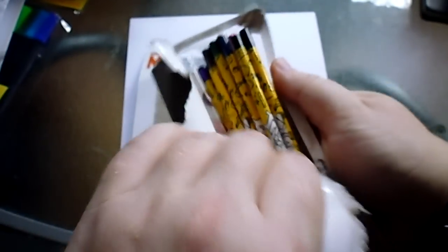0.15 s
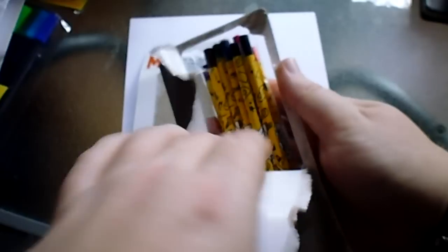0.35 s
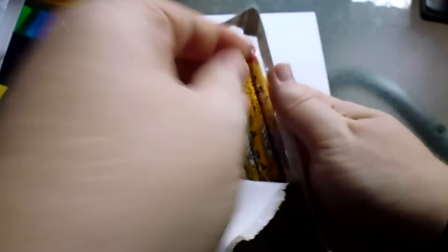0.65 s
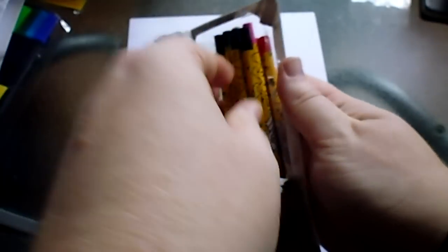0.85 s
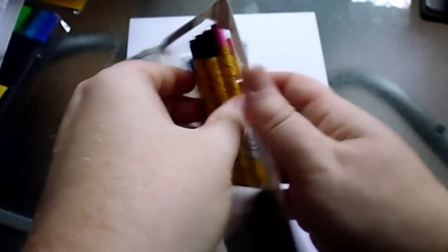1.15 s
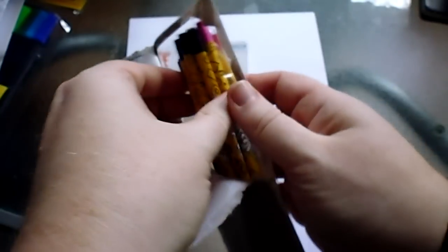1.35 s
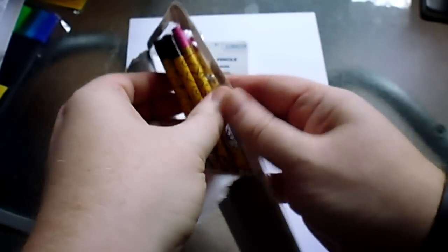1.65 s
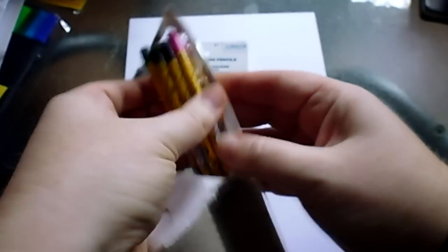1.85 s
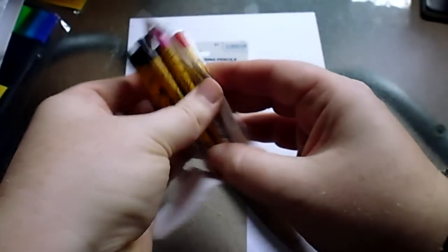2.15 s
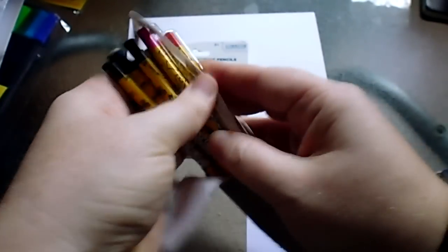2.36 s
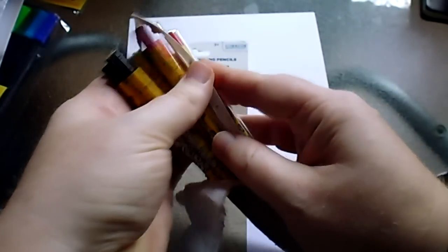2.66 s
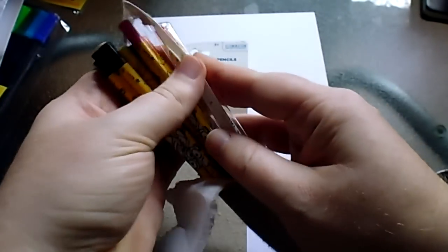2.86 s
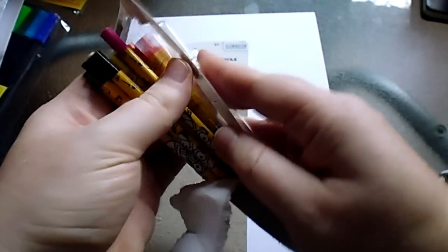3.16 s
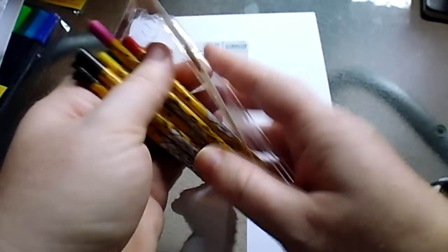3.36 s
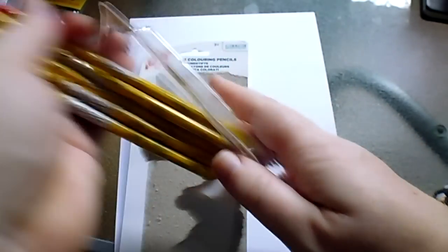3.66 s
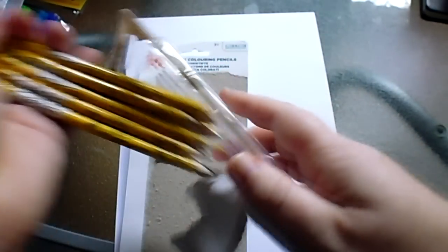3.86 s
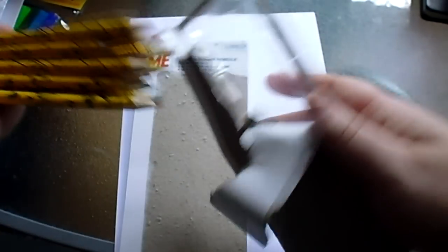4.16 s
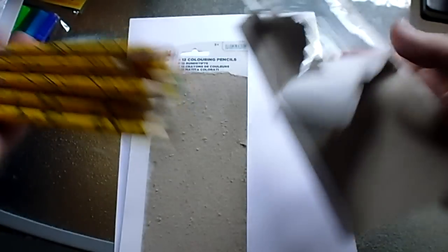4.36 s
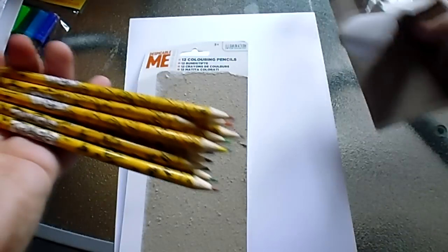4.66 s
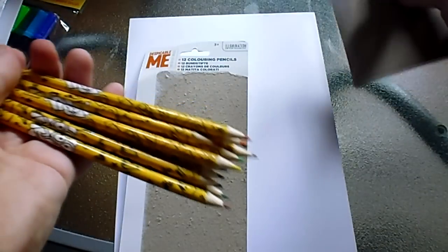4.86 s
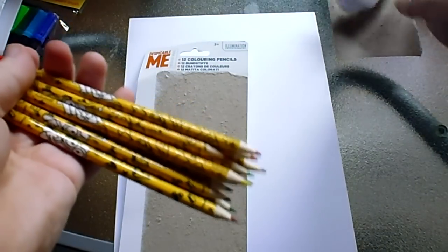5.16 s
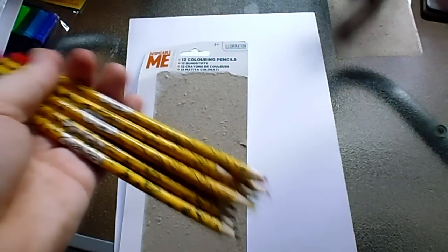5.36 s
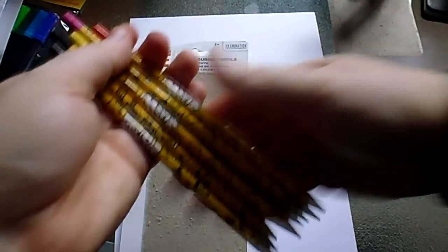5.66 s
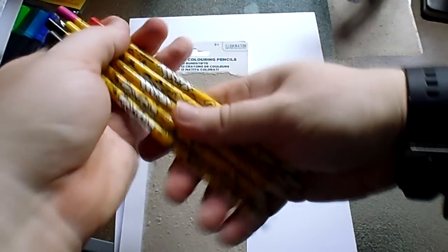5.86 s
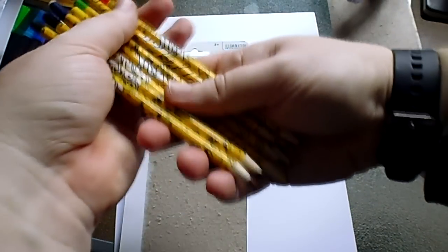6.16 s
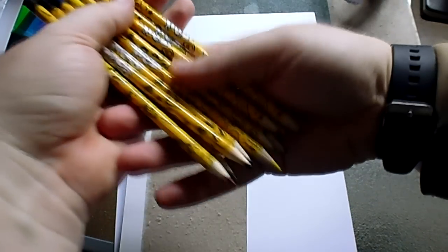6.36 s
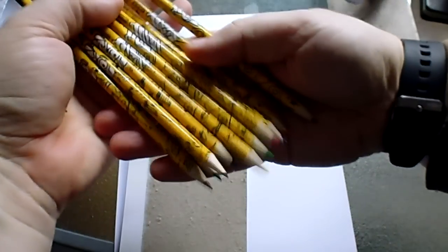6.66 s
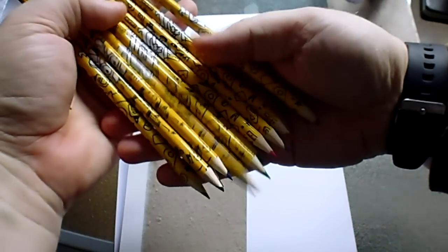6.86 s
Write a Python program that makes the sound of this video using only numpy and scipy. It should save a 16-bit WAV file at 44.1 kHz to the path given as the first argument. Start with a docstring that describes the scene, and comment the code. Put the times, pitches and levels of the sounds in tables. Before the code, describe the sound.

Close, quiet handling: card rasps and stiff plastic ticks and snaps, a tossed pack booms softly on a desk, then pencils roll and clack in the palm.

```python
"""Close up in a quiet room, hands bend a card-backed plastic blister pack to free a bundle of wooden pencils.
Over faint hiss and arm rumble, strokes of rasping card and sliding wood swell and fade; the shell snaps and
ticks as short noisy contacts ring its modes. The pack is tossed aside and lands: the desk booms and rings.
Then the freed pencils roll in the palm and click, as tiny contacts excite their damped bending modes."""
import sys
import numpy as np
from scipy import signal
from scipy.fft import rfft, irfft, next_fast_len
from scipy.io import wavfile

SR = 44100
rng = np.random.default_rng(int(sys.argv[2]) if len(sys.argv) > 2 else 0)


def digitize_waveform(pressure):
    """Quantize a signal to 16-bit integers and store it at the path in sys.argv[1].

    Rows of a 2-D input are taken as channels; values are limited to [-1, 1].
    """
    field = np.atleast_2d(pressure).T
    bounded = np.clip(field, -1, 1)
    quanta = np.round(bounded * 32767).astype(np.int16)
    wavfile.write(sys.argv[1], SR, quanta)


N = 309141
TIME = np.arange(N) / SR
HIT_TIME = TIME[:SR // 10]   # every hit lasts 0.1 s
LEAD_S = .015                # the main contact comes this long after a hit begins

# Modes of the blister shell. Each row: frequency at pitch ratio 1 [Hz], mean level [dB], 60 dB decay [s].
SHELL_MODES = [(774.5, -4.5, 0.039), (987, 3, 0.016), (1463, -3, 0.0051), (1870, 3.5, 0.013),
               (2746, -2.5, 0.012), (3780, -32, 0.0028), (4570, 3, 0.0079), (6510, -19.5, 0.0043)]
# Modes of a hand-held pencil. Each row: frequency at pitch ratio 1 [Hz], mean level [dB], 60 dB decay [s].
PENCIL_MODES = [(800, -11.5, 0.016), (1350, -21.5, 0.0063), (2450, -11, 0.04), (2870, -8, 0.0075),
                (3410, -3, 0.0064), (4330, 1, 0.0076), (5250, -1, 0.0024), (6290, -6, 0.014),
                (7330, -8, 0.0084), (8800, -3.5, 0.0037), (10460, -5, 0.012), (12400, -5, 0.015)]


def from_db(db):
    """Decibels to gain."""
    return 10 ** (np.asarray(db) / 20)


def rms_one(x):
    """Scale to rms 1."""
    return x / np.sqrt(np.mean(x ** 2) + 1e-20)


def unit_energy(x):
    """Scale to energy 1."""
    return x / np.sqrt(np.sum(x ** 2) + 1e-20)


def together(gains):
    """Unrelated noises add in power."""
    return np.sqrt(sum(gain ** 2 for gain in gains))


def add(track, s, sound):
    """Mix a sound in at a given time in seconds."""
    start = round(s * SR)
    track[start:start + len(sound)] += sound[:N - start]


def through(force, response):
    """A force played through a ringing body."""
    return signal.fftconvolve(force, response)[:len(force)]


def colour(x, spectrum):
    """Causal (minimum-phase) filter that follows a table of (Hz, dB)."""
    size = next_fast_len(len(x) + SR // 10)
    hz, db = np.transpose(spectrum)
    bins = np.maximum(np.arange(size // 2 + 1) * SR / size, 1)
    log_gain = np.log(from_db(np.interp(np.log(bins), np.log(hz), db)))
    # folding the cepstrum onto positive time gives the minimum phase
    cepstrum = irfft(log_gain, size)
    cepstrum[1:size // 2] *= 2
    cepstrum[size // 2 + 1:] = 0
    response = np.exp(rfft(cepstrum))
    return irfft(rfft(x, size) * response, size)[:len(x)]


def grains(per_s, spread_db, size):
    """Single-sample ticks of random sign and timing; their strength in dB spreads exponentially."""
    strength = from_db(spread_db * np.minimum(rng.exponential(1, size), 4))
    return (rng.random(size) < per_s / SR) * strength * rng.choice([-1, 1], size)


def flutter(per_s):
    """Smooth random unevenness with rms 1."""
    knots = rng.standard_normal(N // 20)
    return rms_one(np.interp(TIME * per_s, np.arange(len(knots)), knots))


def ringing(modes, pitch, scatter_db):
    """Response to one touch: every contact point feeds the modes differently."""
    hz, db, t60 = np.transpose(modes)[:, :, None]
    gain = from_db(db + scatter_db * rng.standard_normal(db.shape) - 60 * HIT_TIME / t60)
    return unit_energy(np.sum(gain * np.cos(2 * np.pi * hz * pitch * HIT_TIME), axis=0))


def contact(scatter_db, per_s, rise_s, t60):
    """One main contact, LEAD_S in, amid smaller ones that build up just before it and die away after."""
    t = HIT_TIME - LEAD_S
    envelope = from_db(-60 * np.where(t < 0, -t / rise_s, t / t60))   # 60 dB up, 60 dB down
    small = grains(per_s, spread_db=4.5, size=len(t)) * envelope
    force = from_db(scatter_db) * unit_energy(small)
    force[round(LEAD_S * SR)] += 1
    return force


def resonate(x, hz, q, gain_db):
    """Add the one resonance that a blow excites most."""
    return x + from_db(gain_db) * signal.lfilter(*signal.iirpeak(hz, q, fs=SR), x)


def disperse(x, delay_s):
    """Bending waves carry the highs faster than the lows, which smears a crack; delay_s is the lag at 1 kHz."""
    hz = np.arange(len(x) + 1) * SR / (2 * len(x))
    phase = 4 * np.pi * np.sqrt(1000 * hz)
    return irfft(rfft(x, 2 * len(x)) * np.exp(-1j * phase * delay_s))[:len(x)]


def balance(db, weight_db, sharp_db, bass_db):
    """A heavy blow fills the two zones below the ring, a sharp one the zone above it."""
    return db + weight_db + bass_db, db + weight_db, db, db + sharp_db


def voiced(hit, zone_db):
    """Give a hit its weight and brightness: the level of its main 10 ms in four broad zones."""
    # Edges between the bass, body, ring and crack zones [Hz].
    zone_edges_hz = [110, 550, 1500, 4000, 13000]
    main = (HIT_TIME > LEAD_S - .001) & (HIT_TIME < LEAD_S + .009)
    out = 0
    for low_hz, high_hz, db in zip(zone_edges_hz, zone_edges_hz[1:], zone_db):
        zone = signal.butter(3, (low_hz, high_hz), "band", fs=SR, output="sos")
        part = signal.sosfilt(zone, hit)
        out = out + from_db(db) * part / np.sqrt(np.mean(part[main] ** 2))
    return out


def movement(s, swell_s, fade_s, db):
    """Gain of one hand movement: it swells to a peak, then dies away."""
    depth_db = 21.5    # gained over the swell and lost over the fade
    rounding = 1.154   # above 1, a movement lingers at its peak and ends sooner
    away = np.where(TIME < s, (s - TIME) / swell_s, (TIME - s) / fade_s)
    return from_db(db - depth_db * np.minimum(away, 5) ** rounding)


def room_air():
    """Steady noise floor: random noise shaped to a dark, faint hiss."""
    # Colour of the hiss. Each row: frequency [Hz], relative density [dB per Hz].
    hiss_colour = [(20, 1), (40, -6.5), (85, -12.5), (240, -19.5), (700, -23), (1400, -27.5), (2300, -31),
                   (4300, -36), (7200, -32.5), (13000, -42)]
    return from_db(-59.5) * rms_one(colour(rng.standard_normal(N), hiss_colour))


def sway(level_db):
    """Deep noise rumble whose level follows the moving arms."""
    # Ride of the rumble. Each row: time [s], level before the overall trim level_db [dB].
    arm_levels = [(0.0, -57), (2.1, -53), (2.8, -75), (3.5, -78.5), (4.3, -54), (5.15, -51.5),
                  (5.39, -46.5), (5.7, -55), (7.0, -55)]
    rumble_colour = [(8, 0.5), (22, -5.0), (32, -5.5), (55, -11), (120, -22.0), (400, -56.0)]   # (Hz, dB)
    rumble = colour(rng.standard_normal(N), rumble_colour)
    return from_db(level_db + np.interp(TIME, *np.transpose(arm_levels))) * rms_one(rumble)


def desk_ring():
    """The landing shakes the desk into a short boom, and something hard on it rings thin and long."""
    # Modes of the desk and the thing on it. Each row: frequency [Hz], level [dB], 60 dB decay [s].
    desk_modes = [(223, -32, 0.054), (270, -40, 0.081), (348, -50, 0.085), (402, -43, 0.27),
                  (472, -39, 0.076), (544, -34, .08), (590, -33.5, 0.1), (1990, -62, 0.82),
                  (2340, -60, 0.86), (2900, -69, .8)]
    hz, db, t60 = np.transpose(desk_modes)[:, :, None]
    t = TIME[:SR]
    polarity = rng.choice([-1, 1], hz.shape)
    modes = from_db(db - 60 * t / t60) * np.sin(2 * np.pi * hz * t) * polarity
    out = np.zeros(N)
    add(out, 5.19, np.sum(modes, axis=0))
    return out


def thumps(cycles, rise_s):
    """Soft bumps of hand and pack swing for a few low cycles, losing 60 dB over the given number."""
    # The bumps. Each row: start [s], level before rise and decay [dB], pitch [Hz].
    bumps = [(0.435, -39.5, 68), (.876, -42.5, 121), (1.141, -26.5, 224), (1.198, -45, 214),
             (1.843, -47, 149), (2.408, -33, 120), (2.415, -41, 65), (3.893, -33, 199), (4.004, -48.5, 128),
             (4.5, -43, 122), (4.603, -41, 83.4), (5.062, -31.5, 202)]
    out = np.zeros(N)
    for s, db, hz in bumps:
        swell = (1 - np.exp(-HIT_TIME / rise_s)) * from_db(db - 60 * HIT_TIME * hz / cycles)
        add(out, s, swell * np.sin(2 * np.pi * hz * HIT_TIME))
    return out


def friction(spectrum, per_s, spread_db, smooth_db, uneven_db):
    """Surfaces catch and slip in uneven clumps of grains over a smooth hiss; rms 1."""
    slips = rms_one(grains(per_s, spread_db, size=N)) + from_db(smooth_db) * rng.standard_normal(N)
    clumps = from_db(uneven_db * flutter(140))
    return rms_one(colour(slips * clumps, spectrum))


def crinkles(per_s, crack_db):
    """Small creases tick at random, each on one of four panels of the shell; rms 1."""
    out = np.zeros(N)
    for pitch in np.geomspace(.9, 1.9, num=4):
        slips = grains(per_s / 4, spread_db=3, size=N)
        out += through(slips, ringing(SHELL_MODES, pitch, scatter_db=3)) + from_db(crack_db) * slips
    return rms_one(out)


def rubbing(rolling):
    """Strokes bring dull finger noise, rasping card, small creases and the finer hiss of sliding lacquered wood."""
    # Hands push, pull or drag the pack. Each row: peak [s], swell [s], fade [s], card rasp [dB], then,
    # relative to the rasp: finger pressure [dB], wood sliding [dB], crackle [dB].
    strokes = [(0.018, 0.061, 0.086, -44.5, -9.5, 5, 2), (0.19, 0.22, 0.35, -52.5, -3.5, 9.5, 1),
               (0.321, 0.084, 0.14, -49, -3.5, -5.5, -5), (0.95, 0.087, 0.11, -53, -3.5, -5, -9),
               (1.13, 0.098, 0.04, -54.5, -1, 8.5, 2), (1.208, 0.039, 0.088, -39, -9.5, -1, -3),
               (1.38, 0.032, 0.083, -52, -13, -5, -10), (1.52, 0.27, 0.23, -65.5, 1.5, 9, 6),
               (1.69, 0.087, .3, -57, -5, 4.5, -3), (1.86, 0.2, 0.6, -50, -11, 5, -8),
               (2.06, 0.085, 0.16, -48.5, -16, 5, -15), (2.249, 0.086, 0.11, -54, 5.5, 4, 2),
               (2.43, 0.11, 0.087, -42.5, -15, 7, 7), (2.66, 0.036, 0.032, -52, -24, 1.5, 2),
               (2.76, 0.086, 0.051, -57.5, 0, 9, 10), (2.88, .05, 0.11, -68.5, -31, 6, 12),
               (3.121, 0.11, 0.084, -59.5, -17, 8, 9), (3.24, 0.049, 0.094, -56.5, -5, -6, 2),
               (3.39, 0.1, 0.21, -53.5, -5.5, 0, -8), (3.712, 0.22, 0.073, -51.5, -5.5, 5.5, 3),
               (3.908, 0.11, 0.16, -56.5, 4.5, 4.5, -7), (4.199, 0.12, 0.35, -66.5, 4, -4.5, -9),
               (4.379, 0.04, 0.037, -50, -17, -2.5, -13), (4.498, 0.11, 0.043, -47.5, -12, 0.5, -3),
               (4.57, .04, 0.19, -43.5, -11.5, -6, -5), (4.84, 0.28, 0.28, -51, -13, -7.5, -7.5),
               (5.192, 0.14, 0.13, -42, -7.5, 0, -15)]
    # Colours of skin, card and sliding wood. Each row: frequency [Hz], relative density [dB per Hz].
    finger_colour = [(60, -13), (130, -1), (220, -3.5), (400, -1.5), (600, -18.5), (1200, -29.5)]
    card_colour = [(300, -29.5), (550, -7.5), (850, -3), (1300, -5.5), (1900, -3.5), (2600, -8.5),
                   (4500, -48.5)]
    slide_colour = [(1500, -14), (2700, -2.5), (4200, -3), (5500, -3), (7000, -4.5), (9500, -10),
                    (13000, -2.5)]
    rasp, press, glide = from_db(-68), from_db(-75.5), from_db(-66)   # hands that only hold the pack
    crackle = 0
    for s, swell_s, fade_s, db, fingers_db, wood_db, crackle_db in strokes:
        effort = movement(s, swell_s, fade_s, db)
        rasp = together([rasp, effort])
        press = together([press, effort * from_db(fingers_db)])
        glide = together([glide, effort * from_db(wood_db)])
        crackle = together([crackle, effort * from_db(crackle_db)])
    press = together([press, from_db(-65.5) * (TIME > 5.3)])   # loose pencils rub on the skin
    glide = together([glide, rolling * from_db(-5)])           # lacquer slides as the pencils roll
    fingers = press * friction(finger_colour, per_s=400, spread_db=1.0, smooth_db=1, uneven_db=3.5)
    card = rasp * friction(card_colour, per_s=2200, spread_db=5.0, smooth_db=3.5, uneven_db=3.0)
    slide = glide * friction(slide_colour, per_s=870, spread_db=1.5, smooth_db=5.0, uneven_db=2.0)
    ticks = crackle * crinkles(per_s=220, crack_db=-6.5)
    return fingers + card + slide + ticks


def roll_effort():
    """Gain of the pencils rolling over each other in the palm, as a chain of hand movements."""
    # The rolls. Each row: peak [s], swell [s], fade [s], peak level [dB].
    rolls = [(5.4, .25, 0.47, -71), (5.89, .06, .12, -57), (6.151, 0.12, 0.15, -49),
             (6.35, 0.18, 0.19, -60), (6.6, 0.17, 0.45, -65), (6.79, 0.24, 0.21, -59)]
    return together(movement(*roll) for roll in rolls)


def pencil_roll(per_s):
    """The faces of four pencils, each held differently, tip over each other in tiny contacts; rms 1."""
    out = np.zeros(N)
    for pitch in np.linspace(.93, 1.05, num=4):
        wood = ringing(PENCIL_MODES, pitch, scatter_db=2)
        out += through(grains(per_s / 4, spread_db=0.5, size=N), wood)
    return rms_one(out)


def pencil_clicks(level_db):
    """Hard wood on wood: a brief chatter along the shafts sets off bending modes, damped by the hand."""
    # Pencil against pencil. Each row: main contact [s], level before the trim level_db [dB], weight [dB],
    # sharpness [dB], pitch ratio set by the grip, main ring [Hz], second ring [Hz].
    clicks = [(5.777, -59, -22, -10, 1, 2420, 2900), (5.853, -64, -13, 10, 1, 6200, 9000),
              (5.8706, -45, -12, 10, 0.9, 4950, 6700), (6.1294, -36, -12.5, -2, 0.94, 4370, 2740),
              (6.139, -57, -10, -1, 1.06, 4270, 5000), (6.149, -49, -23, -6, 1, 2500, 4200),
              (6.186, -35.5, -12.5, 3, 0.94, 4090, 7500), (6.336, -57, -9, -2, 1.07, 2920, 3580),
              (6.3416, -41, -14, -6, 0.93, 2320, 4220), (6.571, -55.5, -5.5, -23, 0.93, 4350, 2200),
              (6.7085, -42, -18, 0, 0.917, 5600, 3050), (6.767, -30.5, -16.5, 3, 0.92, 3830, 5980),
              (6.938, -61.5, -7, 6.5, 0.7, 7240, 4200), (6.99, -57.5, 6.5, -7, 1, 913, 2380)]
    out = np.zeros(N)
    for s, db, weight_db, sharp_db, pitch, main_hz, second_hz in clicks:
        wood = ringing(PENCIL_MODES, pitch, scatter_db=1)
        force = contact(-3.5, per_s=8900, rise_s=0.007, t60=0.0076)
        hit = resonate(through(force, wood), main_hz, q=20, gain_db=6)
        hit = resonate(hit, second_hz, q=22, gain_db=5)
        add(out, s - LEAD_S, voiced(hit, balance(db, weight_db, sharp_db, bass_db=-13)))
    return from_db(level_db) * out


def bundle_ring(wood):
    """The neighbours in the bundle ring along with a struck pencil, each ring cut off at 0.1 s."""
    # Modes of the neighbours. Each row: frequency [Hz], mean level [dB], 60 dB decay [s].
    bundle_modes = [(2180, -3, .14), (2510, -5.5, .17), (2860, -5.5, .19), (3480, -6, 0.17),
                    (4430, -4.5, 0.12), (4440, 3, 0.14), (6800, 1, 0.18)]
    return from_db(-23.5) * through(wood, ringing(bundle_modes, 1, scatter_db=1.5))


def pack_snaps(crack_db, pitch_spread, level_db):
    """The shell buckles with a crack amid smaller creases, and the bent panel rings briefly."""
    # The pack snaps or lands. Each row: main contact [s], level before the crease colour [dB], weight of the
    # card's body [dB], sharpness of the crack [dB], crumple around the snap [dB], main ring [Hz].
    snaps = [(0.019, -34, -11, -7.5, 16, 3350), (0.079, -44, -8, -10, -9, 4300),
             (0.0981, -47, 3, -5, -23, 820), (0.1275, -42, -4, -4.5, 22, 4200),
             (0.1667, -42.5, 0.5, -2, 8, 930), (0.185, -45, -10, -16, -8, 2730),
             (0.2067, -39.5, -4.5, -13, -20, 3860), (0.298, -53.5, 8, -11, 18, 930),
             (0.3096, -41.5, -3, -11, 12, 2850), (0.435, -46.5, 2.5, -14, 9, 2960),
             (0.487, -54.5, 4.5, -10, 8, 690), (0.8758, -42, 2.5, -11, 4, 720),
             (0.9845, -46, 4, -13, -12, 870), (1.138, -36, 0.5, -2, 14, 3550),
             (1.144, -40, 1, -10, 23, 980), (1.1879, -34.5, -8, -3.5, 10, 2600),
             (1.204, -31, -18, 0, 4, 2560), (1.2161, -34, -4, -4, 21, 3040),
             (1.25, -35, -6, -6.5, -10, 2950), (1.3279, -53, 5, -6, 2, 1280),
             (1.3662, -39, 2, -16, 10.5, 744), (1.482, -50.5, -4, 3, -8, 3580),
             (1.5019, -40, 0.5, -3, -3, 955), (1.5155, -51.5, 7, -12, -7, 970),
             (1.8372, -48, 7, -13, 15, 1060), (1.8462, -36, 5.5, -7, 4.5, 940),
             (1.8662, -36, 1, -8, 0, 1190), (1.996, -28.5, -17, 7, -3, 4600),
             (2.01, -29, -13, 1.5, -2, 4300), (2.0519, -36.5, 2.5, -11, 11, 1400),
             (2.077, -36, -0.5, -11, 19, 2380), (2.133, -46.5, 3.5, -10.5, -2.5, 955),
             (2.1822, -40, -1, -22, -16.5, 1880), (2.195, -41.5, -11, -7, -6, 1940),
             (2.2172, -43, -4, -5, 5.5, 1910), (2.233, -34, -4.5, -8, -3, 1940),
             (2.2447, -33.5, -21, -13, -2, 2980), (2.2694, -42.5, -7, 0, -8, 2100),
             (2.3029, -34, 2, -15, -2, 2830), (2.3445, -30, 1, -11.5, 1.5, 1800),
             (2.3736, -35, -1, -11, 7, 1930), (2.3827, -19, -10, -4, -1.5, 1800),
             (2.413, -14.5, -11.5, -9.5, -17.5, 2860), (2.4472, -20.5, -8.5, -8.5, 0.5, 2750),
             (2.6986, -32.5, -7.5, -3, -7, 1560), (2.7401, -35.5, -15, -14, -5.5, 2060),
             (2.7517, -35, -5, -21, -9, 1750), (2.8544, -53, -8, -3.5, -5, 2810),
             (3.111, -31, -16, -8.5, -9, 1900), (3.2133, -37.5, -6, -10.5, -9, 2700),
             (3.3782, -48.5, -3, -7.5, 5, 4800), (3.3993, -51.5, -5, 3.5, -1, 2150),
             (3.698, -44, -16, -3, 12, 2300), (4.009, -54, -3, -6, 3, 1900),
             (4.1276, -31.5, -2, -23, -7, 1970), (4.481, -43, -5, -17, 19, 1500),
             (4.5011, -44, 2, -18, 5, 1690), (4.5525, -36.5, -4, -11, 11, 2870),
             (4.5653, -35.5, -5.5, -8.5, 28, 1710), (4.603, -42, 1.5, -16, 16, 2100),
             (4.6369, -34, -1.5, -32, -0.5, 1540), (4.6811, -45.5, 3.5, -20, 12, 1490),
             (4.7493, -45.5, -10, -8, 0, 2350), (4.7921, -45.5, -2, -29, 4, 1720),
             (4.831, -37, -3.5, -12.5, -5, 1720), (5.061, -53.5, 10, -11, 6, 700),
             (5.1313, -33.5, -2.5, -3, 16, 3300), (5.1777, -27.5, 0, -22, -4.5, 3160),
             (5.1844, -28, -0.5, -11, 4, 950), (5.204, -31.5, -0.5, -7, 3, 2980),
             (5.2405, -37, -0.5, -15, -1.5, 3350)]
    # Colour of a buckling crease's force. Each row: frequency [Hz], gain [dB].
    crease_colour = [(120, -5), (300, 1), (470, -7), (750, -1.5), (1500, -3), (2800, -1), (3700, -3.5),
                     (4700, -2), (7000, 4), (10000, 0), (13000, -4)]
    out = np.zeros(N)
    for s, db, weight_db, sharp_db, crumple_db, ring_hz in snaps:
        # a crumple swells, a clean snap is sudden
        build_up_s = np.clip(.0025 * from_db(crumple_db), .001, .02)
        force = contact(crumple_db, per_s=3000, rise_s=build_up_s, t60=0.034)
        pitch = np.exp(pitch_spread * rng.standard_normal())
        panel = ringing(SHELL_MODES, pitch, scatter_db=-2.0)
        panel[0] += from_db(crack_db)   # the direct crack
        hit = resonate(through(force, panel), ring_hz, q=4.9, gain_db=6.5)
        hit = disperse(hit, delay_s=.0009)
        add(out, s - LEAD_S, voiced(hit, balance(db, weight_db, sharp_db, bass_db=-11)))
    return from_db(level_db) * colour(out, crease_colour)


def room(x, early_db, early_t60, tail_db, tail_t60, gap_s):
    """Quick reflections off the desk and hands, then the short, duller tail of a furnished room."""
    t = TIME[:SR // 2]
    early = grains(1100, spread_db=-1.0, size=len(t)) * from_db(-60 * t / early_t60) * (t > gap_s)
    tail = rng.standard_normal(len(t)) * from_db(-60 * t / tail_t60) * (t > 2 * gap_s)
    echoes = from_db(early_db) * unit_energy(early) + from_db(tail_db) * unit_energy(tail)
    walls = [(200, 2.5), (2500, -5.5), (6000, -6), (12000, -4.0)]   # (Hz, dB)
    return x + signal.fftconvolve(x, colour(echoes, walls))[:N]


def scene():
    """The handling sounds in the room, over its faint rumble and hiss."""
    rolling = roll_effort()
    handling = thumps(cycles=8.4, rise_s=0.0028) + rubbing(rolling)
    handling = handling + pack_snaps(crack_db=3, pitch_spread=.08, level_db=0.0)
    wood = rolling * pencil_roll(per_s=600) + pencil_clicks(level_db=-0.9)
    wood = wood + bundle_ring(wood)
    pack = room(handling, early_db=-9.5, early_t60=0.049, tail_db=-16, tail_t60=0.25, gap_s=0.0078)
    pencils = room(wood, early_db=-8.0, early_t60=0.059, tail_db=-15.5, tail_t60=0.25, gap_s=0.0032)
    return (room_air() + sway(level_db=-1.5) + desk_ring() + pencils + pack)[None]


def record(dry):
    """A small microphone with one notch near 8 kHz in its falling treble; peaks are rounded and the top is cut."""
    # Treble of the microphone. Each row: frequency [Hz], gain [dB].
    treble = [(3300, 1), (3750, 2.5), (4400, 1), (6000, -1.5), (7550, -7), (8050, -20), (8600, -9.5),
              (9800, -16.5), (11500, -26.5), (12700, -30), (14500, -45.5)]
    heard = colour(dry[0], treble)
    heard = heard / (1 + heard ** 4) ** .25   # rounds the highest peaks
    top_cut = signal.cheby2(12, 60, 14600, fs=SR, output="sos")   # 60 dB down from 14.6 kHz
    return signal.sosfilt(top_cut, heard)[None]


dry = scene()
out = record(dry)
digitize_waveform(out)
```